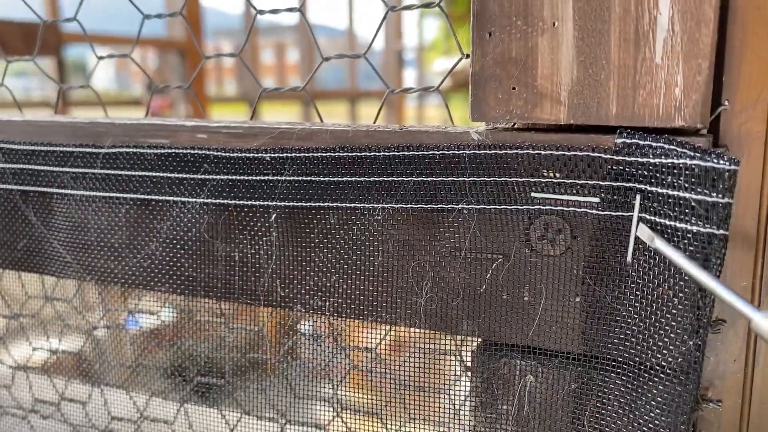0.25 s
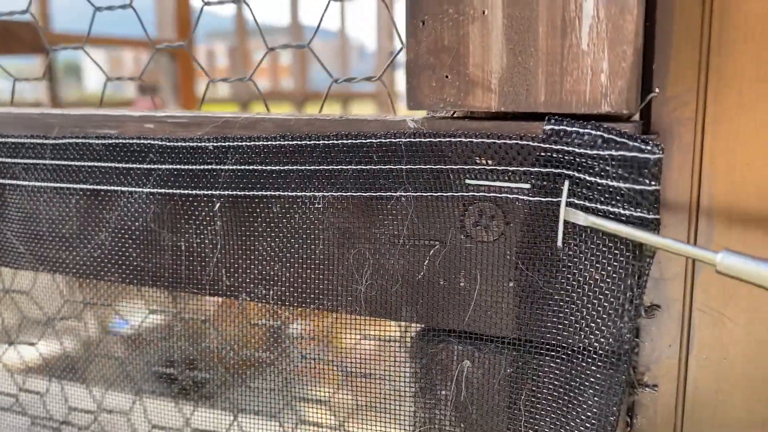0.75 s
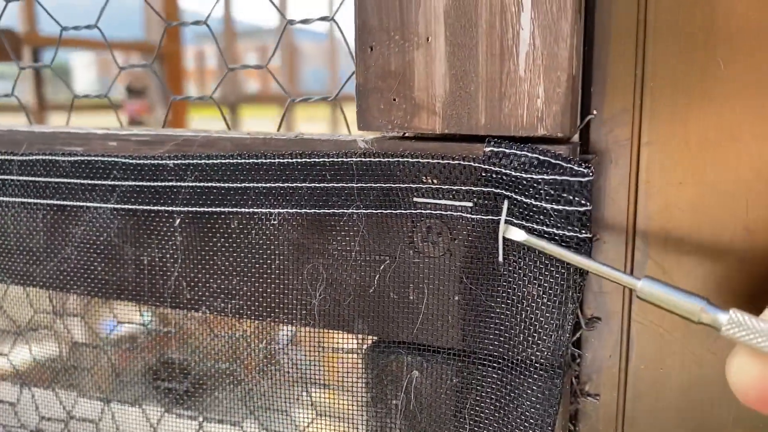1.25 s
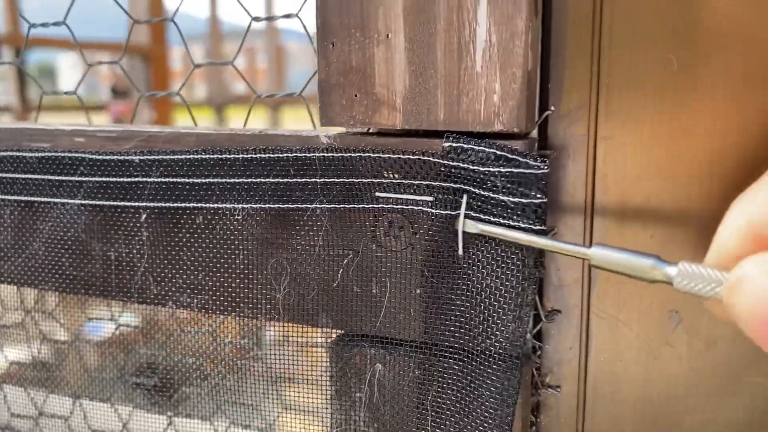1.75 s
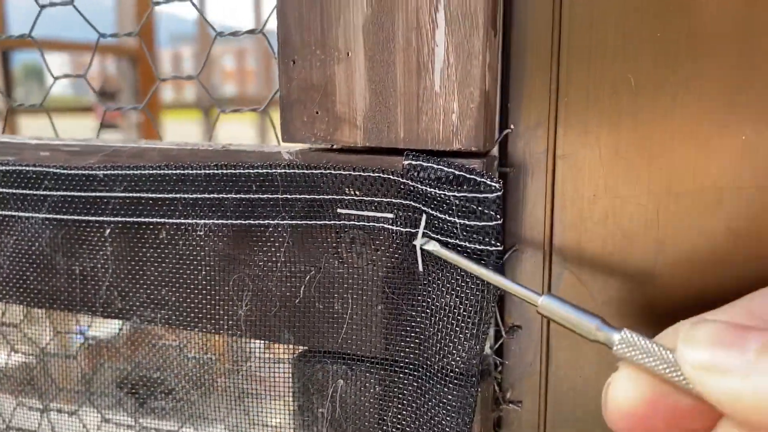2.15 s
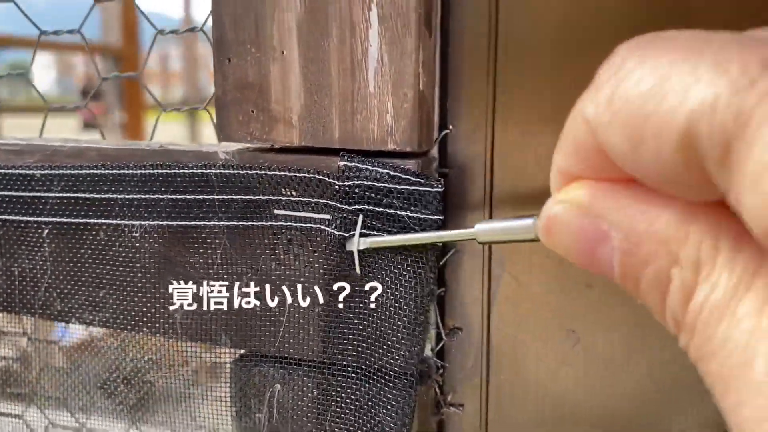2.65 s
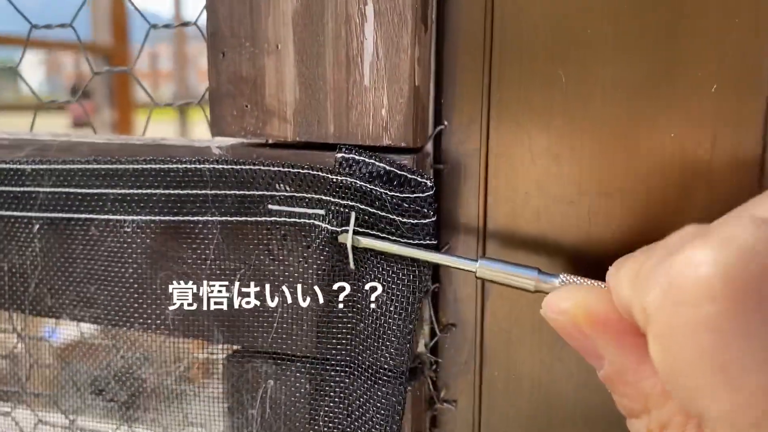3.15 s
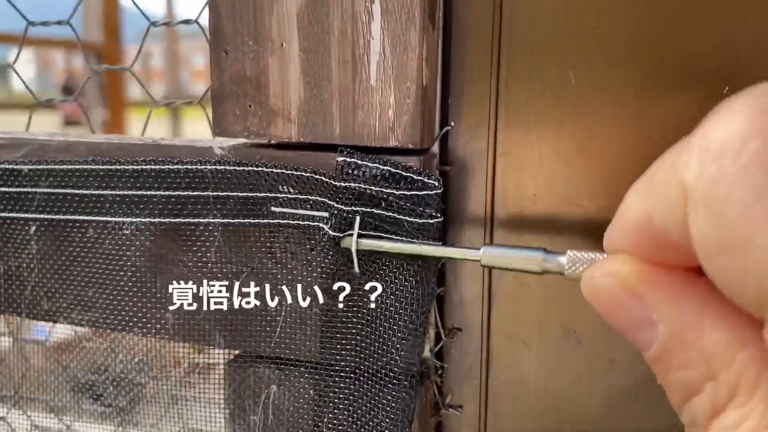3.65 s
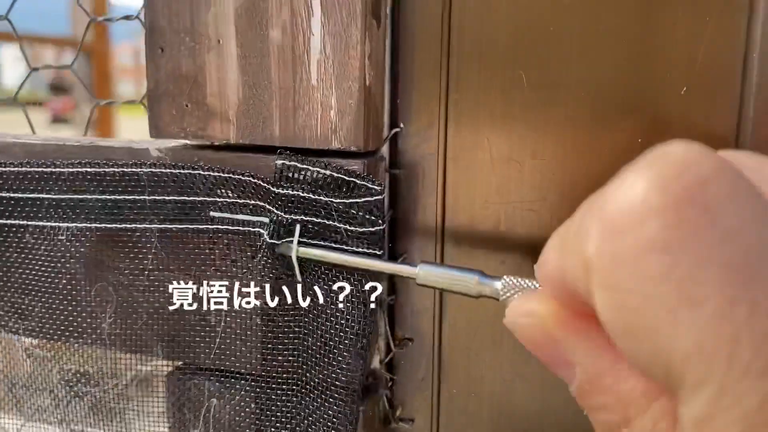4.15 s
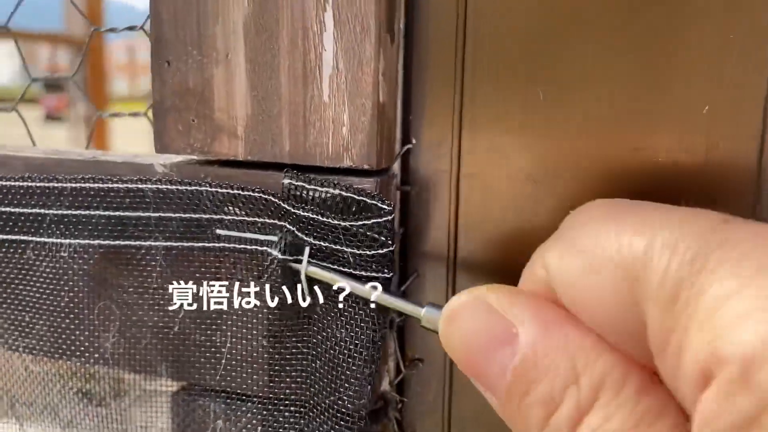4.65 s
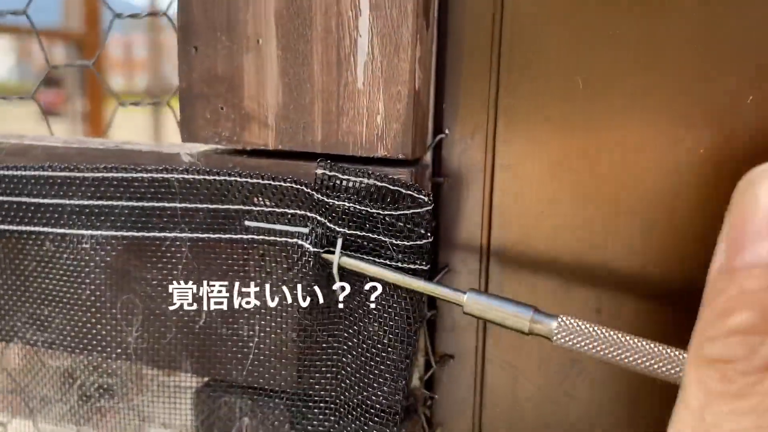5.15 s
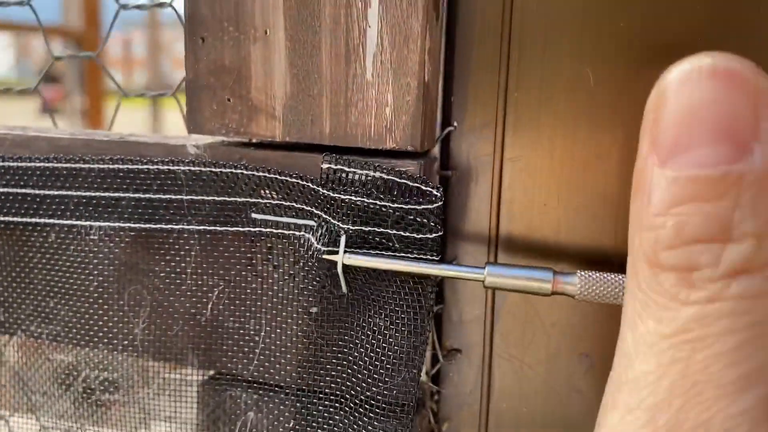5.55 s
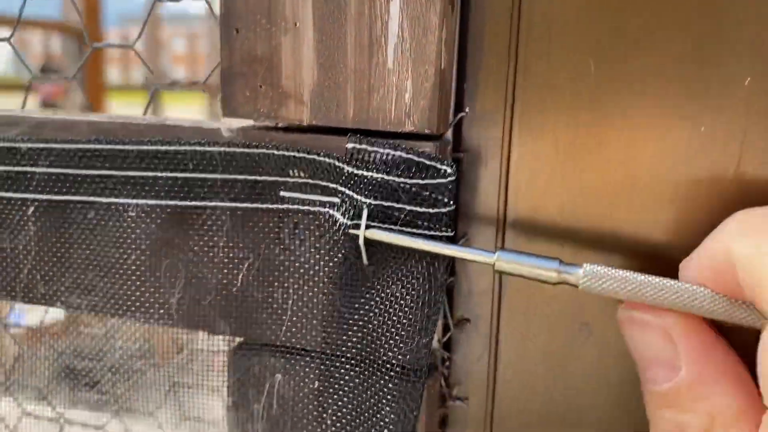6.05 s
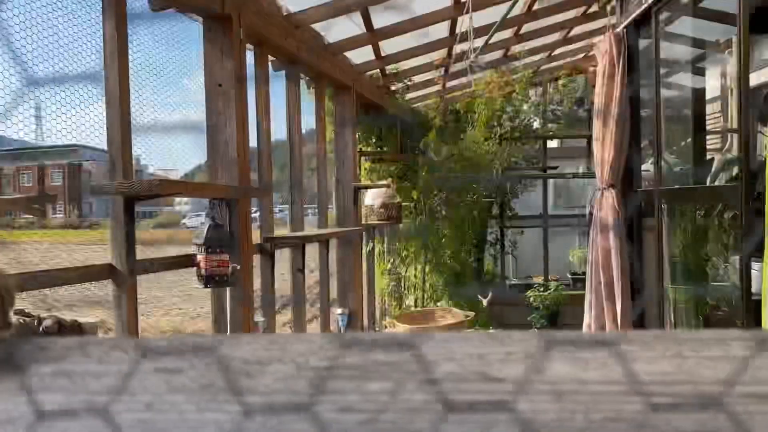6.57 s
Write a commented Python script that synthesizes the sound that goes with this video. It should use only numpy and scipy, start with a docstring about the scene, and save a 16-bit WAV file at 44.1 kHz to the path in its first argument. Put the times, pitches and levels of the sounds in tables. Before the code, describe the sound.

Close on a quiet porch, a slim steel pick levers a staple in mesh with sharp metallic clicks and faint scrapes, while a distant bird chirps.

```python
"""On a quiet porch, close to the microphone, a slim steel pick levers a staple out of mesh on a wooden frame.
Each levering stroke is dense stick-slip noise that rasps the steel and rustles the mesh; the tip creeps,
snaps off the staple as a crack with ringing modes, and leaves it shivering. Hard slips and knocks thump the frame.
Far off a small bird chirps in falling whistles over a low outdoor rumble of shaped noise.
When the work stops, the outdoor background opens up."""
import sys
import numpy as np
from scipy import signal
from scipy.fft import rfft, irfft, next_fast_len
from scipy.io import wavfile
from scipy.ndimage import uniform_filter1d

SR = 44100
rng = np.random.default_rng(int(sys.argv[2]) if len(sys.argv) > 2 else 0)


def generate_wav(sig):
    """Save sig (samples, or channels by samples) to the path in sys.argv[1] as 16-bit PCM at SR."""
    pcm = np.round(np.clip(np.atleast_2d(sig).T, -1, 1) * 32767).astype(np.int16)
    wavfile.write(sys.argv[1], SR, pcm)


N = 300321
TIME = np.arange(N) / SR

# slips of the tip on the staple:
# (time [s], relative level [dB], brightness [dB], favoured ring [Hz], slide time [s])
SLIP_EVENTS = [(.059, -54, 5, 3480, 0.000046), (.27, -82, 18, 2900, 0.00017), (.51, -59, 5, 4060, .00017),
               (.622, -74.5, 13, 3593, 0.00025), (.713, -65, -0.5, 4060, .0012),
               (1.01, -23.5, -2.5, 3567, 0.000099), (1.213, -48, -2.5, 3046, 0.00015),
               (1.823, -46, -2, 3047, 0.000046), (2.3378, -32, -5.5, 2970, 0.00045),
               (2.497, -54.5, 1.5, 3400, 0.00041), (2.785, -57, -23, 2835, .00026),
               (2.825, -44, 1.5, 2800, 0.00078), (2.843, -52, 3.5, 2920, 0.0003),
               (2.996, -48, -10, 3018, 0.0018), (3.034, -47, -11, 3550, 0.00023),
               (3.056, -58, 1.5, 3410, 0.00022), (3.084, -52, 2.5, 3150, 0.00025),
               (3.158, -58.5, -0.5, 3000, 0.00014), (3.357, -50, 2, 2865, 0.00023),
               (3.431, -54, -24, 3113, 0.00023), (3.644, -51, 1, 3450, .00025),
               (3.906, -54.5, 2, 3118, 0.000085), (4.097, -53.5, 0.5, 3228, .00011),
               (4.287, -48.5, -7, 3350, 0.00015), (4.314, -30, 2.5, 3190, 0.00033),
               (4.471, -38, -4, 3325, 0.00075), (4.719, -62.5, 10.5, 3833, 0.00014),
               (4.899, -51.5, -17, 3570, 0.011), (5.064, -42.5, -9, 3490, 0.0019),
               (5.171, -50, -10, 3605, 0.0009), (5.213, -53.5, -17.5, 3530, 0.001),
               (5.277, -41.5, -15, 3714, 0.00079), (5.384, -49, 1.5, 3003, .00018),
               (5.456, -40, 2, 3116, .00014), (5.4655, -11, -10.5, 3614, 0.0011),
               (5.833, -47, -12, 3450, 0.0018), (6.186, -54, -3.5, 2983, 0.0024),
               (6.241, -28.5, -15.5, 3265, 0.00019), (6.26, -50, -1, 3567, .00025),
               (6.291, -50, -14, 3130, .0003), (6.304, -49, -9, 3120, 0.00013),
               (6.343, -31.5, -12, 3097, 0.0079)]
# modes of pick, staple and the wood under them: (frequency [Hz], relative level [dB], t60 [s])
STEEL_MODES = [(379.4, -16, 0.016), (737, -10.5, 0.027), (972, -14.5, 0.025), (1360, -13.5, 0.037),
               (1915, -26, 0.029), (2146, -21.5, 0.04), (2420, -20.5, 0.02), (2770, -7, 0.036),
               (2894, -4, 0.034), (2970, -4, .034), (3268, -2, .032), (3556, -1.5, 0.011),
               (3674, -6, 0.023), (3807, -7, 0.024), (4370, -8, 0.016), (4550, -15.5, 0.024),
               (5160, -13.5, .019), (5900, -11, 0.022), (6360, -9, 0.036), (6770, -6.5, 0.031),
               (7290, -7.5, 0.033), (10370, -22.5, 0.042), (13200, -21.5, 0.013), (14470, -20.5, 0.025)]
# colour of the mesh: (frequency [Hz], relative level [dB])
MESH_COLOUR = [(2000, -7), (4000, 1.5), (5000, -6), (6200, -1.5), (7700, 0), (9000, -10), (11000, -1.5),
               (13500, -11), (15500, -19.5)]
# the left port hears the pick first until the microphone is moved: (time [s], left lead [s])
LEFT_LEAD = [(5.9, .00016), (6.2, -.00029)]


def undb(db):
    """Decibels to gain."""
    return 10 ** (np.asarray(db) / 20)


def unit(x):
    """Scale to rms 1."""
    return x / np.sqrt(np.mean(x ** 2))


def fade(t, t60):
    """Exponential decay, 60 dB in t60 seconds."""
    return np.exp(-np.log(1000) * t / t60)


def add(out, s, x):
    """Mix a stereo sound in at time s."""
    i = max(int(s * SR), 0)
    out[:, i:i + x.shape[1]] += x[:, :N - i]


def filtered(x, gain):
    """Apply a gain given as a function of frequency."""
    size = next_fast_len(x.shape[-1] + 1024)
    hz = np.maximum(np.fft.rfftfreq(size, 1 / SR), 1)
    return irfft(rfft(x, size) * gain(hz), size)[..., :x.shape[-1]]


def colour(x, points):
    """Shape by a spectrum of (frequency [Hz], level [dB]) points, joined on a log frequency axis."""
    hz, db = np.transpose(points)
    return filtered(x, lambda f: undb(np.interp(np.log(f), np.log(hz), db)))


def pan(db):
    """Gains of both channels for left minus right in dB."""
    return undb(np.array([[db], [-db]]) / 2)


def staggered(x, lead_s):
    """Let the left port hear the sound earlier (negative: later)."""
    lead = int(lead_s * SR)
    left = np.roll(x[0], max(-lead, 0))
    right = np.roll(x[1], max(lead, 0))
    return np.array([left, right])


def walk(rate):
    """Smooth random wander, spread near 1, through rate random points a second."""
    knots = rng.standard_normal(2048)
    return np.interp(TIME * rate, np.arange(len(knots)), knots)


def lifted(modes, centre_hz, lift_db, octaves):
    """The point of contact favours the modes near one frequency."""
    lifted_modes = []
    for hz, db, t60 in modes:
        distance = np.log2(hz / centre_hz) / octaves
        lifted_modes.append((hz, db + lift_db * np.exp(-distance ** 2), t60))
    return lifted_modes


def ring(modes, t, scatter_db, spread, detune):
    """Decaying modes; each blow weights them anew and each reaches the two ports in its own phase."""
    hz, db, t60 = np.transpose(modes)[:, :, None]
    size, pitch, phase, left, right = rng.standard_normal((5, len(hz), 1))
    angle = 2 * np.pi * hz * (1 + detune * pitch) * t + phase
    decay = undb(db + scatter_db * size) * fade(t, t60)
    return np.array([np.sum(decay * np.sin(angle + spread * port), axis=0) for port in (left, right)])


def air(spectrum, db, side, pan_db):
    """Far outdoor noise, more alike at both ports in the bass, gently wavering."""
    middle, apart = rng.standard_normal((2, N))
    apart = colour(apart, [(50, -6.0), (200, 1), (1000, 5.5)])
    both = middle + side * apart * np.array([[1], [-1]])
    return unit(colour(both, spectrum)) * pan(pan_db) * undb(db + .5 * walk(4.6))


def catches(per_s, scatter_db):
    """Random stick-slip impulses, most small and a few large."""
    sizes = undb(scatter_db * np.minimum(rng.exponential(size=N), 4))
    struck = rng.random(N) < per_s / SR
    return unit(struck * sizes * rng.choice([-1, 1], N))


def friction():
    """Strength of rasp and hiss: each stroke swells and eases; each slip has a short creep before and a shiver after."""
    # levering strokes that drag the tip along:
    # (start time [s], length [s], relative steel rasp level [dB], relative mesh hiss level [dB])
    strokes = [(0.167, 0.072, -71, -81), (0.431, 0.45, -82, -73), (1.473, 0.13, -73.5, -88),
               (1.747, 0.072, -61, -69.5), (2.107, 0.068, -75, -71), (2.228, 0.46, -70, -72.5),
               (2.804, 0.11, -60, -61.5), (2.956, 0.25, -69, -76.5), (3.293, 0.49, -70, -73.5),
               (3.815, 0.2, -71.5, -73.5), (4.138, 0.14, -68, -70), (4.367, 0.41, -65, -60.5),
               (4.682, .42, -75, -68.5), (5.03, 0.13, -55, -61), (5.127, .18, -69, -72.5),
               (5.589, 0.2, -70, -76), (5.84, 0.17, -68, -81), (5.94, .14, -66.5, -62),
               (6.148, 0.094, -61.5, -66.5), (6.284, .11, -52, -60.5)]
    attack_s, hold = 0.025, 0.51  # time to build up; share of a stroke gone before it eases off
    creep_db, creep_db_per_s = -20.5, 950  # the tip starts to creep just before it slips
    shiver_db, shiver_max_db, shiver_db_per_s = -20, -47.5, 146.5  # staple and netting shiver on
    shake_hiss_db = -14.5  # mesh rustle that goes with creep and shiver

    # powers, starting from the tip resting on the staple
    rasp, hiss = np.full(N, undb(-87.5) ** 2), np.full(N, undb(-84.5) ** 2)
    for s, length_s, rasp_db, hiss_db in strokes:
        rise = (TIME - s) / attack_s
        fall = (s + length_s - TIME) / (length_s * (1 - hold))
        effort = np.clip(np.minimum(rise, fall), 0, 1) ** 2
        rasp += effort * undb(rasp_db) ** 2
        hiss += effort * undb(hiss_db) ** 2
    for s, db, *_ in SLIP_EVENTS:
        near = slice(max(int((s - .1) * SR), 0), int((s + .5) * SR))
        t = TIME[near] - s
        creep = db + creep_db + creep_db_per_s * t
        shiver = min(db + shiver_db, shiver_max_db) - shiver_db_per_s * t
        shake = undb(np.where(t < 0, creep, shiver))
        rasp[near] += shake ** 2
        hiss[near] += (shake * undb(shake_hiss_db)) ** 2
    return np.sqrt(rasp), np.sqrt(hiss)


def drag():
    """Dense stick-slip grains ring the steel, favouring the pitch of the last slip, and rustle the mesh."""
    rasp_gain, hiss_gain = friction()
    grains = catches(1100, scatter_db=5.0) + .5 * rng.standard_normal((2, N))
    snags = catches(50, scatter_db=2.5)  # coarse catches among the fine grains

    slip_s, _, _, ring_hz, _ = np.transpose(SLIP_EVENTS)
    last_slip = np.maximum(np.searchsorted(slip_s, TIME) - 1, 0)
    modes = [m for m in STEEL_MODES if 2500 < m[0] < 4500]
    modes = lifted(modes, ring_hz[last_slip], lift_db=9.5, octaves=0.1)
    push = grains + snags
    rasp = 0
    for hz, db, _ in modes:
        rasp = rasp + undb(db) * filtered(push, lambda f: 1 / (1 + 1j * (f - hz) / 130) ** 2)
    rasp = unit(rasp) * rasp_gain * undb(-2.5 + 3.7 * walk(60))

    rustle = grains + undb(-6) * snags + .8 * rng.standard_normal(N)
    hiss = unit(colour(rustle, MESH_COLOUR)) * hiss_gain * undb(1.5 * walk(52))
    return rasp + staggered(hiss, LEFT_LEAD[0][1])


def blow(db, ring_hz, slide_s):
    """A crack and a hand-damped ring, as wood, steel, bright and top bands; a slow slide swells in, a quick one snaps."""
    # borders between the four bands: (wood to steel [Hz], steel to bright [Hz], bright to top [Hz])
    band_edges = (2000, 5000, 9000)
    low, middle, high = band_edges
    edges = [(300, low), (low, middle), (middle, high), (high, 15000)]
    t = np.arange(SR // 8) / SR
    swell = 1 - np.exp(-(t / slide_s) ** 2)

    # a hard snap wakes every mode, a light touch only a few
    lift_db = np.interp(db, [-45, -25], [8, 1.5])
    modes = lifted(STEEL_MODES, ring_hz, lift_db, octaves=0.1)
    tone = unit(ring(modes, t, scatter_db=1.2, spread=.6, detune=.002) * swell)

    # noise partly shared by both ports
    crack = rng.standard_normal(len(t)) + .4 * rng.standard_normal((2, len(t)))
    decay = fade(t, .004 + 5 * slide_s) + .1 * fade(t, .03)
    crack = unit(colour(crack * swell * decay, MESH_COLOUR))

    parts = []
    for edge in edges:
        band = signal.butter(3, edge, "band", fs=SR, output="sos")
        parts.append(signal.sosfilt(band, tone + undb(-3.0) * crack))
    # the longer the push, the duller the wood answers
    dull = signal.butter(2, np.clip(1.8 / slide_s, 600, 4000), fs=SR, output="sos")
    parts[0] = signal.sosfilt(dull, parts[0])
    return [undb(db - 15.5) * unit(part) for part in parts]


def slips():
    """The tip jumps off the staple; the sharper the edge it leaves, the more treble and wood join the steel."""
    out = np.zeros((2, N))
    for s, db, bright_db, ring_hz, slide_s in SLIP_EVENTS:
        wood, steel, bright, top = blow(db, ring_hz, slide_s)
        # the duller the slip, the weaker its highest band beside the bright one
        top_gain = undb(-5 + 0.48 * bright_db)
        treble = undb(bright_db) * (bright + top_gain * top)
        # the body sounds from a broad surface, the treble from the tip alone
        tip = staggered(treble, np.interp(s, *np.transpose(LEFT_LEAD)))
        wood_gain = undb(-8.5 + 0.6 * bright_db)  # sharper slips send more to the wood
        body = pan(-2.0) * wood_gain * wood + pan(-1.5) * steel
        add(out, s, body + tip)
    return out


def knocks():
    """The pick butts against the frame, and only the wood answers."""
    # dull knocks of the pick on the wood: (time [s], relative level [dB], push time [s])
    knock_events = [(0.06, -44.5, 0.00019), (2.3339, -35.5, 0.0016), (2.356, -38.5, 0.0045),
                    (4.416, -41, 0.019), (4.471, -25.5, 0.0023)]
    ring_hz, limit_hz = 676, 1410  # favoured ring; the wood passes little above the limit
    out = np.zeros((2, N))
    for s, db, push_s in knock_events:
        wood, *_ = blow(db, ring_hz, push_s)
        add(out, s, pan(-1.0) * wood)
    return signal.sosfilt(signal.butter(2, limit_hz, fs=SR, output="sos"), out)


def bird(length_s=0.048, fall=0.054, octave_db=-20):
    """Thin, slightly unsteady falling whistles with a weak octave."""
    # distant chirps: (time [s], starting pitch [Hz], level [dB])
    chirp_events = [(0.439, 4970, -70), (.51, 5270, -69), (1.24, 5300, -64.5), (1.27, 4920, -69),
                    (1.945, 5360, -69), (2.09, 4920, -68.5), (2.687, 5330, -68.5), (2.941, 4920, -67),
                    (3.44, 5330, -66), (3.825, 4870, -70)]
    out, u = np.zeros((2, N)), np.linspace(0, 1, int(length_s * SR))
    for s, hz, db in chirp_events:
        glide = 1 - fall * u ** rng.uniform(.7, 1.1) + .009 * walk(500)[:len(u)]
        phase = 2 * np.pi * np.cumsum(hz * glide) / SR
        whistle = np.sin(phase) + undb(octave_db) * np.sin(2 * phase)
        add(out, s, pan(0.46) * undb(db) * np.sin(np.pi * u) * whistle)
    return out


def jolts():
    """The frame springs back with a dull knock when the pick lets go; its boom builds more slowly."""
    # jolts of the frame: (time [s], relative level [dB], favoured frequency [Hz], its lift [dB])
    jolt_events = [(1.011, -48, 450, 5.5), (2.335, -33.5, 284, 3.5), (4.471, -35.5, 704, 3),
                   (5.472, -46, 112, 13)]
    # modes of the wooden frame: (frequency [Hz], relative level [dB], t60 [s])
    frame_modes = [(38, -11, 0.33), (52.7, -5, 0.68), (71.8, 0, .6), (87.8, -6, .35), (111.4, -9, 0.29),
                   (152, -13, 0.4), (192, -5, 0.15), (297.5, -10, 0.29), (324, -7, .16), (366, -12, 0.23),
                   (399, -11, 0.24), (432, -1, 0.047), (518, -12, 0.2), (600, -2.5, 0.048), (689, -10, .2),
                   (664, -5, 0.031), (840, -9, 0.043), (986, -10, 0.15)]
    split_hz = 230  # boom below, knock above
    out, t = np.zeros((2, N)), np.arange(SR // 2) / SR
    for s, db, hz, lift_db in jolt_events:
        modes = lifted(frame_modes, hz, lift_db, octaves=0.77)
        deep = [m for m in modes if m[0] < split_hz]
        upper = [m for m in modes if m[0] >= split_hz]
        boom = ring(deep, t, scatter_db=.8, spread=.3, detune=.01) * (1 - fade(t, 0.045))
        knock = ring(upper, t, scatter_db=1, spread=.55, detune=.01) * (1 - fade(t, 0.005))
        add(out, s, undb(db) * pan(-8.0) * (undb(2.0) * boom + undb(1.5) * knock))
    return out


def porch(x):
    """Scattered echoes from posts, wall and roof, as noise bands that each die away at their own pace."""
    # echo of the porch and its wire netting: (frequency [Hz], level [dB], late t60 [s])
    echo_bands = [(150, -12, 1), (494, -8, 1), (1100, -3.5, 0.42), (2010, -4.5, .3), (2850, -15, 0.23),
                  (3500, -11, 0.21), (4600, -7.5, .3), (6860, -11, 0.1), (13000, -20.5, 0.18)]
    t = np.arange(int(.6 * SR)) / SR
    hz, db, t60 = np.transpose(echo_bands)
    noise, echo = rng.standard_normal((2, len(t))), 0
    for k, weights in enumerate(np.eye(len(hz))):
        band = filtered(noise, lambda f: np.interp(np.log(f), np.log(hz), weights))
        # a long tail and a stronger short one, both building up gradually
        shape = (fade(t, t60[k]) + 2.5 * fade(t, 0.093)) * (1 - fade(t, 0.016))
        echo = echo + undb(db[k]) * band * shape / np.linalg.norm(shape)
    return signal.fftconvolve(x, echo, axes=1)[:, :N]


def scene():
    """Pick, frame and bird in the porch echo, over the outdoor background that comes from the right."""
    # low outdoor background: (frequency [Hz], relative level [dB])
    rumble_spectrum = [(18, -39.5), (30, -13), (48, 0.5), (87, 1.5), (145, -9.5), (230, -13.5),
                       (300, -14.5), (480, -20), (800, -22.5), (1380, -30.5), (2400, -38.5), (4000, -49.5),
                       (8000, -63), (15000, -66.5)]
    # what joins it once the work stops: (frequency [Hz], relative level [dB])
    open_spectrum = [(88, -21), (200, -1), (420, 1.5), (600, -1.5), (900, -3.5), (2150, -16), (3050, -33),
                     (8000, -52), (15000, -86)]
    open_s, opening_s = 6.475, 0.0046  # time the work stops; length of the opening

    opened = np.clip((TIME - open_s) / opening_s, 0, 1)
    background = air(rumble_spectrum, db=-52, side=0.57, pan_db=-2.0)
    background += opened * air(open_spectrum, db=-51.5, side=0.44, pan_db=-2.0)
    scrape = drag() * (1 - opened)
    work = slips() + knocks() + jolts()
    chirps = bird()
    echoes = porch(work + 2 * chirps)  # the distant bird excites more echo
    return work + chirps + echoes + scrape + staggered(background, -.00029)


def record(dry, threshold_db=-21, recover_s=0.064):
    """Gain control ducks behind loud snaps; the level dips briefly once; peaks are rounded and the top is cut."""
    # brief dip in level: (start time [s], end time [s])
    dip_span = (1.102, 1.122)
    keep = np.exp(-1 / (recover_s * SR))
    power = signal.lfilter([1 - keep], [1, -keep], np.mean(dry ** 2, axis=0))
    ducked = dry / np.sqrt(1 + power / undb(threshold_db) ** 2)

    ceiling = .95
    rounded = ceiling * ducked / (ceiling ** 6 + ducked ** 6) ** (1 / 6)

    inside = (TIME > dip_span[0]) & (TIME < dip_span[1])
    dip = uniform_filter1d(1. * inside, size=128)  # softened edges
    top_cut = signal.ellip(8, .2, 70, 15800, fs=SR, output="sos")
    return signal.sosfilt(top_cut, rounded * undb(-24 * dip))


dry = scene()
out = record(dry)
generate_wav(out)
```